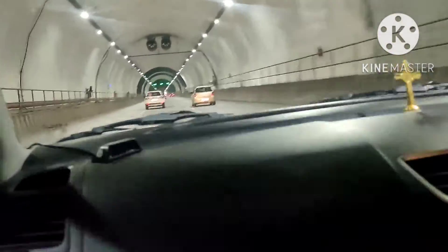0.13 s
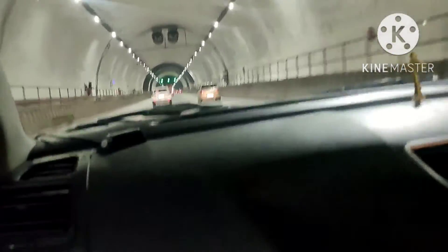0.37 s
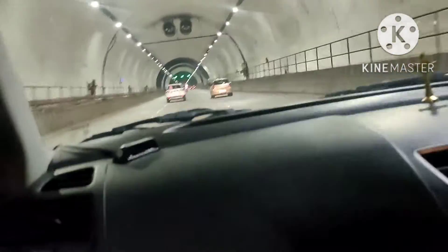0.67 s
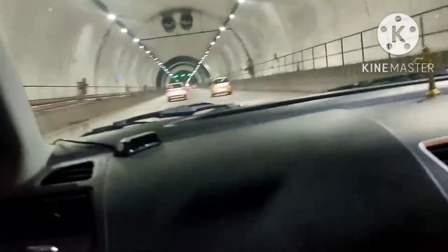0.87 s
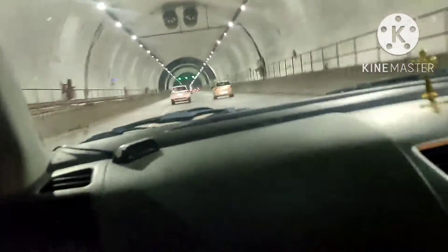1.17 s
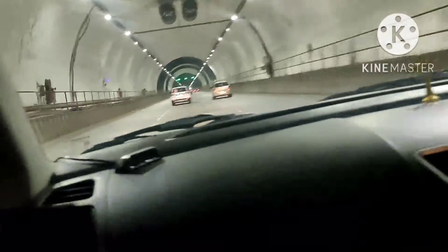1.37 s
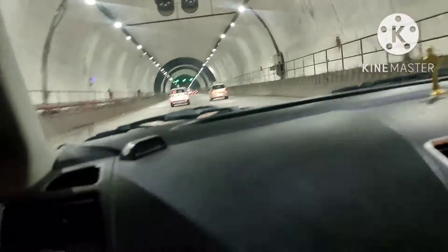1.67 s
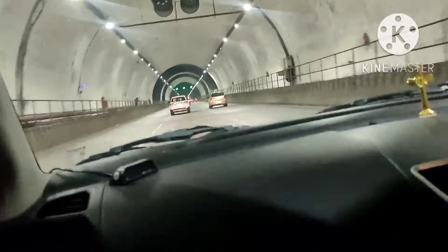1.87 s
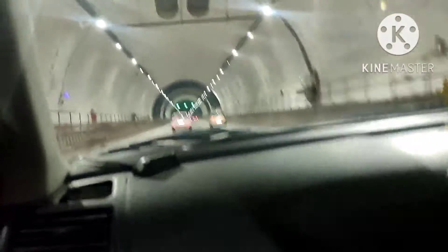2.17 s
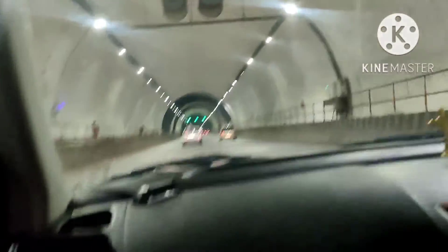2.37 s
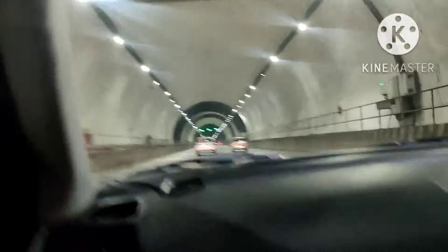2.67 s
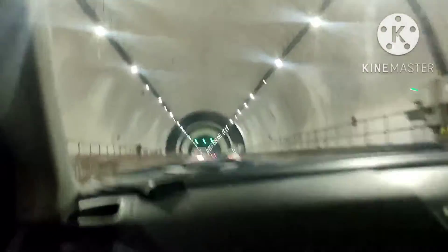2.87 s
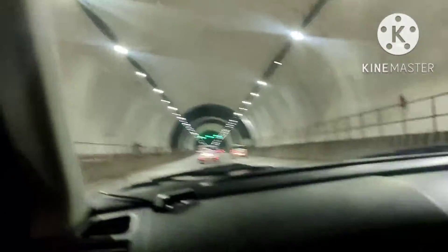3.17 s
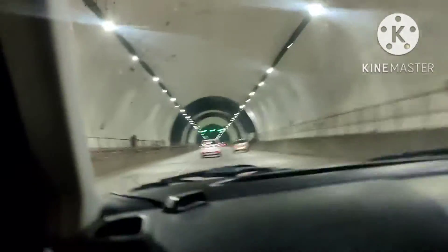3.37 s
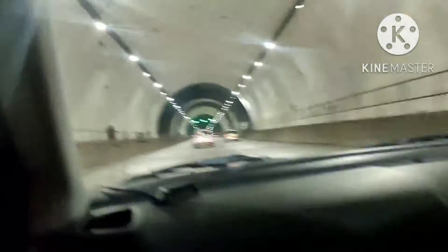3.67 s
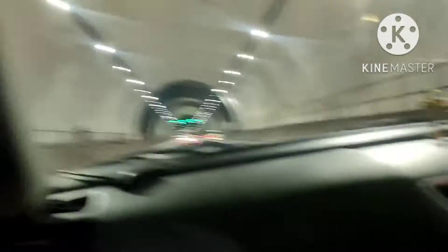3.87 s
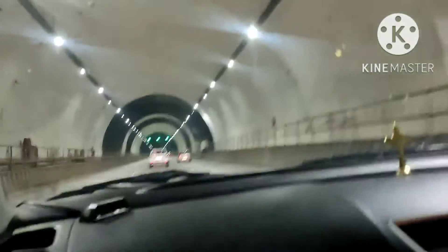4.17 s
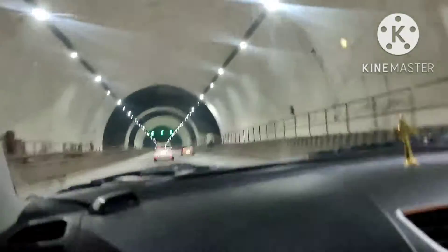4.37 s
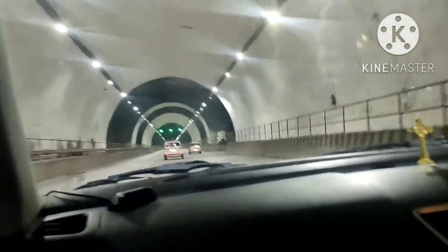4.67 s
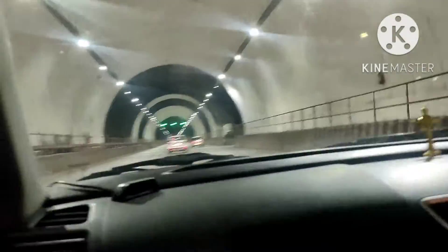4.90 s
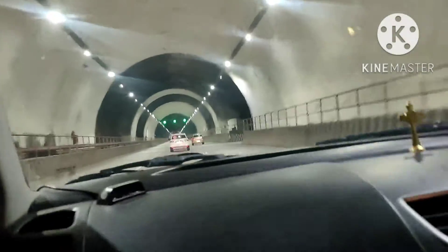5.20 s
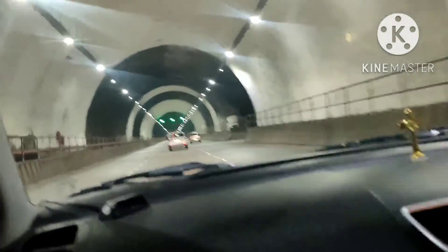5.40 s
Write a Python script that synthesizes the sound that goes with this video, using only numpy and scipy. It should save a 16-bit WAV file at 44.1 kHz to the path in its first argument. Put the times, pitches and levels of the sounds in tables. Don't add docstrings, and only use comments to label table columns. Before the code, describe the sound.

A car cabin rolls through a road tunnel for about five and a half seconds, picked up in stereo by a hand-held phone. A heavy low rumble runs throughout, swelling and shuddering as the floor and roof boom over humps and seams. Over it lies a steady, smooth tyre roar, muffled by glass and blended by the tunnel walls. Loose trim clicks in a quick cluster from 0 to 0.6 s, then more sparsely; a short chatter comes at 1.8 s and a crisp tick at 2.3 s. The rumble grows towards 2.8 s with knocks and busy rattling, then drops back. Another bass heave arrives near 3.4 s, the sharpest rattle at 3.7 s, and more jolts and chatter at 4.4 to 4.7 s. The end is calmer, with a bump around 5.2 s and a last rattle near 5.5 s. Faint buzzing and barely audible hiss remain beneath.

```python
import sys
import numpy as np
from scipy import signal
from scipy.fft import rfft, irfft
from scipy.io import wavfile
from scipy.ndimage import uniform_filter1d

SR = 44100
rng = np.random.default_rng(int(sys.argv[2]) if len(sys.argv) > 2 else 0)


def nominal_scale(level):
    x = np.asarray(level, float) / 20
    return 10 ** x


def pcm_store(signal):
    levels = np.round(np.clip(np.atleast_2d(signal), -1, 1) * 32767)
    wavfile.write(sys.argv[1], SR, levels.astype(np.int16).T)


N = 244314


def rms_one(x):
    return x / np.sqrt(np.mean(x ** 2) + 1e-20)


def at_hz(points, hz):
    point_hz, value = np.transpose(points)
    return np.interp(np.log(hz), np.log(point_hz), value)


def fft_hz():
    return np.arange(N // 2 + 1) * SR / N + 1e-3


def drift(rate_hz):
    pole = np.exp(-2 * np.pi * rate_hz * 40 / SR)
    noise = rng.standard_normal(N // 40 + 2002)
    slow = rms_one(signal.lfilter([1], [1, -2 * pole, pole ** 2], noise)[2000:])
    return np.interp(np.arange(N) / 40, np.arange(len(slow)), slow)


def band(x, low_hz, high_hz):
    return signal.sosfilt(signal.butter(2, [low_hz, high_hz], "band", fs=SR, output="sos"), x)


def peak(x, hz, width_hz, gain_db):
    return x + (nominal_scale(gain_db) - 1) * signal.lfilter(*signal.iirpeak(hz, hz / width_hz, fs=SR), x)


def field(gain):
    # pitch_hz, correlation (-1 to 1)
    likeness = [(30, 0.99), (70, 0.97), (140, 1), (310, 0.83), (690, 0.52), (1550, -0.36), (3500, 0.17),
                (7900, -0.14)]
    alike = np.clip(at_hz(likeness, fft_hz()), -0.9, 0.999)
    mid, side = rfft(rng.standard_normal((2, N))) * gain
    mid = irfft(mid, N)
    side = irfft(side * np.sqrt((1 - alike) / (1 + alike)), N)
    return np.array([mid + side, mid - side]) / np.std(mid)


def road_swing():
    # start_s, level_db
    road = [(0, -25), (.75, -28.5), (1.4, -27.5), (2.15, -25), (2.45, -23.5), (2.8, -19.5), (2.93, -28),
            (3.3, -27.5), (3.5, -24), (4.05, -24), (4.45, -27), (5.05, -25), (5.4, -25.5), (5.54, -25)]
    start_s, level_db = np.transpose(road)
    road_db = np.interp(np.arange(N) / SR, start_s, level_db)
    return road_db - road_db.mean()


def shake(sharpness, level_db, follows, wander_db):
    # start_s, lift_db (below 0 a smooth patch), sharpness (0 soft - 3
    humps = [(.12, 1, 0.044), (.45, 1.5, 0.2), (.86, 4, 0), (1.19, 8.5, 0.6), (1.38, 5, 0.064),
             (1.71, 8, 0.6), (1.95, 2.5, 0.3), (2.63, 3.5, 0.042), (2.81, 3.5, 0.036), (3.4, 8.5, 0),
             (3.55, 2.5, 0.2), (3.65, 0.5, 0.6), (3.76, 0, 0.3), (3.88, 2, 0.05), (4.89, 5.5, 0.25),
             (5.02, 5.5, 0.2), (4.1, 4, 0.29), (.03, 1.5, 0.022), (5.2, 4, 0), (5.4, 4.5, 0.046),
             (5.3, 4.5, .4), (3.27, 4.5, .3), (5.52, -1.5, 0.96)]
    # start_s, lift_db (below 0 a smooth patch), sharpness (0 soft - 3 hard)
    seams = [(0.045, 7.5, 2.5), (3.5, 4, 2.2), (3.55, 1.5, 2), (3.4, 5.5, 3), (0.37, 7.5, 1.44),
             (0.46, 6, 2), (0.52, 6.5, 2.44), (1.101, 9, 2), (.3, 3.5, 1.23), (3, 6.5, 2), (1.7, 4, 3),
             (2.3, 8, 3), (.98, 7, 3), (0.872, 5.5, 2), (2.1, 7, 2.8), (1.71, 0.5, 2), (1.799, 7, 2),
             (2.02, 8.5, 1.9), (2.3894, 11, 2), (2.4994, 5.5, 1), (2.568, 3.5, 0.47), (2.631, 11.5, 3),
             (2.807, 7, 3), (3.427, 9.5, 1.3), (3.818, 5.5, 1.5), (3.879, 10.5, 2), (8.7, 2, 0.72),
             (4.67, 14, 3.36), (4.2, 6.5, 1.2), (4.791, -1, 3.5), (5.232, 11, 2), (5.28, 2, 2),
             (2.2, 8, 1.3), (4.3, -3, 1), (1.4, -10, 1.4), (1.93, -7, 2.3), (2.7, -2, 4.2), (3.6, -4.5, 3),
             (4.3, -6, 3.5), (2.05, 5.5, 3), (4.5, 3.5, 2.6), (2.8, -4, 3), (.64, 3, 2), (0.076, 1.5, 2)]
    rise_s, fall_s = 0.031, 0.03
    reach = 0.52
    t = np.arange(N // 64 + 2) * 64 / SR
    start_s, lift_db, sharp = np.transpose([*humps, *seams])[:, :, None]
    shape = np.exp(-((t - start_s) / np.where(t < start_s, rise_s, fall_s)) ** 2)
    answer = np.exp(-((sharp - sharpness) / reach) ** 2)
    jolts_db = np.interp(np.arange(N) / SR, t, (lift_db * answer * shape).sum(axis=0))
    return level_db + follows * road_swing() + jolts_db + wander_db * drift(14)


def shell(modes, shake_db, evenness):
    hz = fft_hz()
    power = sum(nominal_scale(db) ** 2 / (1 + ((hz - f) / width) ** 2) ** 2 for f, width, db in modes)
    half_filter = power ** 0.25
    sound = field(half_filter)
    swell = uniform_filter1d(sound.mean(axis=0) ** 2, size=2600)
    swell = uniform_filter1d(swell, size=2600)
    shaken = nominal_scale(shake_db) * sound / (swell + 0.057) ** (evenness / 2)
    ringing = irfft(rfft(shaken) * half_filter, N)
    return rms_one(ringing) * np.sqrt(np.mean(nominal_scale(shake_db) ** 2))


def body_shell():
    # pitch_hz, width_hz, level_db
    boom_modes = [(26, 36, -11.5), (34.7, 11.6, 5), (50.4, 34.4, -1.5), (72.4, 12, -3)]
    # pitch_hz, width_hz, level_db
    pan_modes = [(108, 18, -4), (116.6, 28, -1.5)]
    # pitch_hz, width_hz, level_db
    roof_modes = [(138, 58.5, -15), (170, 8.2, -0.5), (193, 9, -8.5)]
    # pitch_hz, width_hz, level_db
    tyre_modes = [(239.5, 21.6, 0.12), (296.6, 34.6, -1.4), (329.5, 8.9, 1)]
    boom = shell(boom_modes, shake(0, level_db=-24.5, follows=1, wander_db=1.88), evenness=0)
    pan = shell(pan_modes, shake(1, level_db=-33.5, follows=1, wander_db=1), evenness=0)
    roof = shell(roof_modes, shake(2, level_db=-35, follows=0.83, wander_db=1.5), evenness=0.23)
    tyre = shell(tyre_modes, shake(3, level_db=-43, follows=0.18, wander_db=1.5), evenness=1)
    return boom + pan + roof + tyre


def tyre_roar():
    # pitch_hz, level_db (per Hz)
    roar_colour = [(200, 2.5), (370, -5.5), (450, 1.5), (540, -2), (700, -6), (900, -6), (1020, -11.5),
                   (1170, -9.5), (1400, -15.5), (2200, -17), (3000, -25.5), (4300, -27), (5000, -38),
                   (7800, -37)]
    # pitch_hz, half_width_hz, lift_db
    glass_modes = [(530, 18, 4.5), (588, 10, -1), (760, 26, -1), (884, 21, 2.5), (940, 16, -2),
                   (1159, 15, 3), (1215, 12, -2.5), (4830, 25, 6), (7260, 60, 1)]
    hz = fft_hz()
    glass = 1 + sum((nominal_scale(db) - 1) / (1 + ((hz - f) / width) ** 2) for f, width, db in glass_modes)
    roar = field(nominal_scale(at_hz(roar_colour, hz)) * glass)
    lows = signal.sosfilt(signal.butter(2, 1500, fs=SR, output="sos"), roar)
    highs = roar - lows
    flickering = lows * nominal_scale(0.16 * drift(0.85)) + highs * nominal_scale(0.8 * drift(17.0))
    return nominal_scale(-43 + 0.08 * road_swing()) * flickering


def trim_touch(peak_db, pan_db, body_db, ring_hz, loss_db, tail_db):
    first_heard = [
        [0.89],
        [.5],
    ]
    bounce_s, bounce_scatter, bounce_chance_db = 0.0031, 0.1, 1
    cabin_t60_s, cabin_db = 0.074, -7
    t = np.arange(4410) / SR
    grain = rng.standard_normal((2, 4410))
    when, size = rng.uniform(-1, 1, (2, 5))
    turn = np.arange(5)
    rebound = turn > 0
    starts_s = bounce_s * (turn + bounce_scatter * when * rebound)
    sizes = nominal_scale(-loss_db * turn + bounce_chance_db * size * rebound)

    since = t - starts_s[:, None]
    rattle = np.exp(-np.abs(since) / 0.001) * (since >= 0)
    grit = (0.45 * sizes[:, None] * rattle).sum(axis=0)
    cracks = np.zeros(4410)
    cracks[np.round(starts_s * SR).astype(int)] = 5.74 * sizes * np.sign(when)
    tail = nominal_scale(cabin_db + tail_db - 60 * t / cabin_t60_s) * (1 - np.exp(-t / 0.0068))
    gain = nominal_scale(peak_db + np.array([[pan_db], [-pan_db]]) / 2)
    burst = (grain * (grit + tail) + cracks * np.where(t == 0, first_heard, 1)) * gain

    near_top = band(band(burst[0], 5300, 7500), 5300, 8500)
    far_top = band(band(burst[1], 6100, 9000), 6100, 9000)
    top = nominal_scale(4.5) * np.array([near_top, far_top])
    push = burst * np.where(t == 0, 0.64, 1)
    body = band(push, ring_hz / 1.69, ring_hz * 1.69)
    body = nominal_scale([[17.0], [14.0]]) * peak(body, ring_hz, width_hz=250, gain_db=8)
    thud = nominal_scale(-13.5) * band(burst, 1300, 3200)
    return top + nominal_scale(body_db) * body + thud


def trim():
    # start_s, peak_db, left_over_right_db, body_db, ring_hz
    ticks = [(0.371, -35.5, -9, -27, 2700), (0.386, -40.5, -6, -26, 3740), (0.4279, -42, -5, -23, 2710),
             (0.488, -36.5, 3, -15.5, 3500), (0.5072, -37, -1, -10.5, 3120), (0.5075, -38.5, 5.5, -7, 5660),
             (0.6212, -38, 3, -26, 2800), (0.987, -41.5, -4.5, -16, 2710), (1.189, -45, 1.5, -27.5, 2700),
             (1.746, -41.5, 7, -12.5, 2980), (2.0992, -47.5, 3, 0.5, 4600), (2.1759, -39.5, 4, -19, 2930),
             (2.2988, -32, -1, -36, 3330), (2.6525, -44.5, 12.5, -24, 5360), (2.7122, -40, 5, -14, 3000),
             (2.7686, -45, 1, -12.5, 4349), (4.144, -43, 1, -25, 2709), (4.6675, -41.5, 1, -22, 4330),
             (5.178, -55.5, 7, -1.5, 3900), (5.317, -57, 6, -9, 5500), (2.1003, -50.5, 6, 1.5, 3400),
             (4.5895, -49, 3, -3, 3080), (4.697, -48, 3, -3.5, 3100), (0.0792, -48, 7, -24, 2720),
             (4.445, -48, 5, -24, 3000)]
    # start_s, peak_db, left_over_right_db, body_db, ring_hz
    chatters = [(0.042, -35, 4, -17.5, 4100), (1.8093, -33.5, 5, -18, 4140), (2.7848, -39.5, 3, -9, 4400),
                (2.8064, -34, 6, -16, 2100), (3.0804, -37.5, -5, -25, 2990), (3.6874, -27, 2.5, -18, 4200),
                (3.7235, -36.5, 3, -11.5, 3300), (4.4323, -35, 1, -19, 3000), (4.587, -44.5, 2, -6.5, 4900),
                (5.47, -35, 3.5, -18, 2920), (4.6942, -37.5, 4, -12, 4400), (2.83, -51, 8, -12, 4200),
                (0.001, -46, 4, -4.5, 3200)]
    # start_s, peak_db
    grazes = [(1.9011, -52), (2.067, -53), (2.4827, -49.5), (2.5351, -60), (3, -48), (2.7032, -41.5),
              (3.8163, -55), (4.077, -48.5), (4.2328, -57), (0.408, -53), (2.042, -51), (2.3105, -53),
              (4.356, -52), (2.868, -50), (2.726, -53), (2.685, -51), (4.1, -50)]
    touches = [(*row, 9, -7) for row in ticks]
    touches += [(s, db, 10.5, -21.5, 2850, 9, -7) for s, db in grazes]
    touches += [(*row, 4.5, -1) for row in chatters]
    out = np.zeros((2, N + 4410))
    for start_s, *settings in touches:
        at = round(start_s * SR)
        out[:, at:at + 4410] += trim_touch(*settings)
    return out[:, :N]


def buzz():
    sizes = nominal_scale(3.6 * np.minimum(rng.exponential(1, (2, N)), 5)) * rng.choice([-1, 1], (2, N))
    clicks = sizes * (rng.random((2, N)) < 2500 / SR)
    level = nominal_scale(-67.5 + 0.8 * road_swing())
    return level * rms_one(band(clicks, 3500, 7800)) * nominal_scale([[2.5], [-2.5]])


def circuit_hiss():
    noise = rng.standard_normal((2, N))
    return nominal_scale(-97.5) * rms_one(band(band(noise, 11000, 15300), 11000, 15300))


def scene():
    # pitch_hz, left_over_right_db
    port_balance = [(60, 0), (110, -2), (200, -2), (310, -5), (520, 2.5), (900, -1.5), (1550, 1),
                    (2670, 3.5), (4000, 7.5), (5200, 7), (6400, 6.5), (7900, -5.5)]
    hz = fft_hz()
    lean_db = at_hz(port_balance, hz) / 2
    node = 1 - 0.51 / (1 + ((hz - 81) / 4.7) ** 2)
    road = body_shell() + tyre_roar()
    road = irfft(rfft(road) * node * nominal_scale([lean_db, -lean_db]), N)
    return road + trim() + buzz()


def low_pass(x):
    return signal.sosfilt(signal.butter(12, 15140, fs=SR, output="sos"), x)


def record(dry):
    # pitch_hz, width_hz, lift_db
    ports = [(6285, 840, 10), (7400, 2600, 7.5)]
    led_in = np.pad(dry, ((0, 0), (4096, 0)), "wrap")
    out = [peak(x, *port) for x, port in zip(led_in, ports)]
    out = signal.sosfilt(signal.butter(2, 18, "high", fs=SR, output="sos"), out)
    out = signal.sosfilt(signal.cheby1(12, 0.5, 7930, fs=SR, output="sos"), out)
    out = signal.sosfilt(signal.cheby2(14, 40, 8080, fs=SR, output="sos"), out)
    mix = out[:, -N:] + circuit_hiss()
    return low_pass(mix)


dry = scene()
out = record(dry)
pcm_store(out)
```